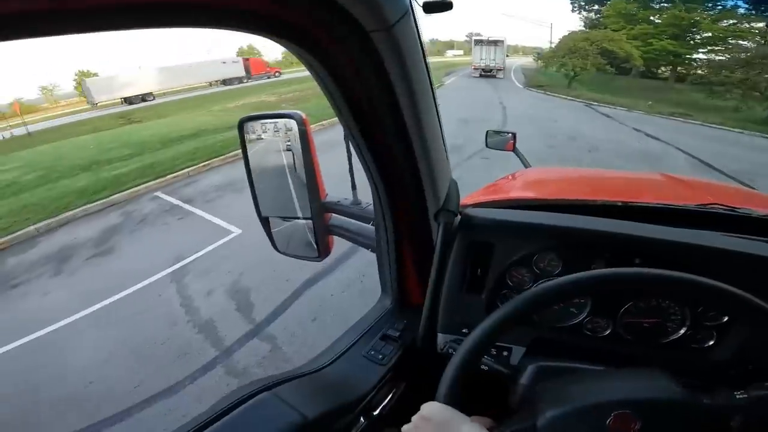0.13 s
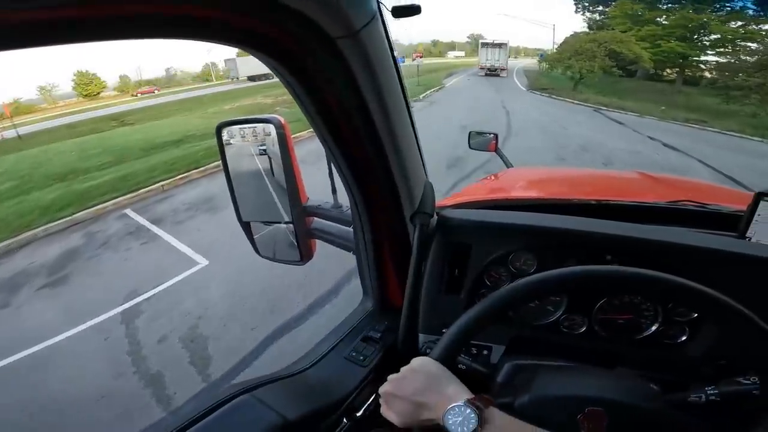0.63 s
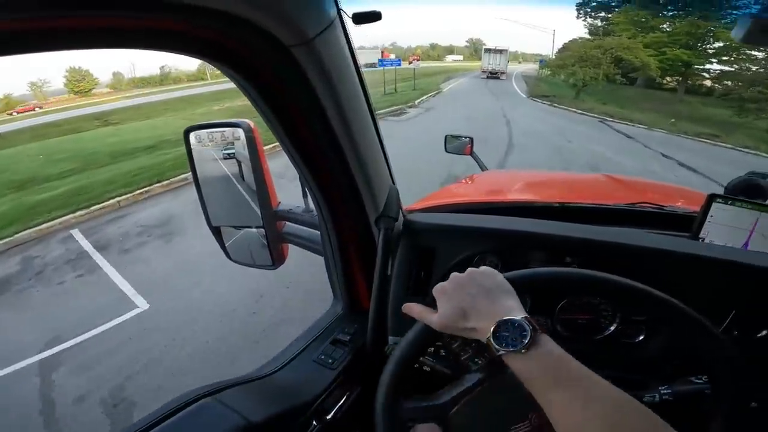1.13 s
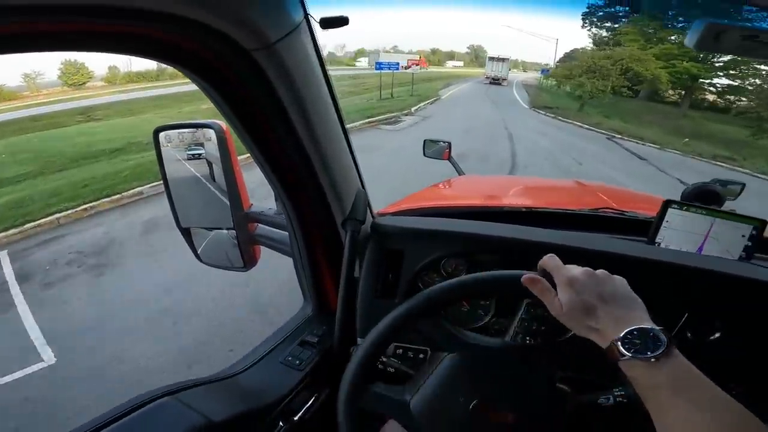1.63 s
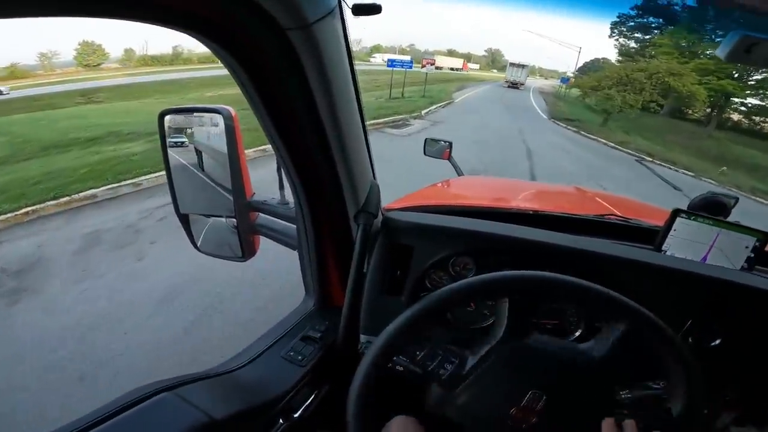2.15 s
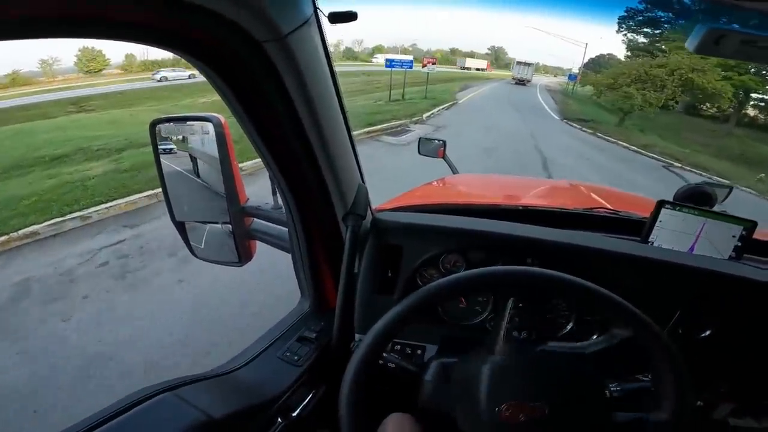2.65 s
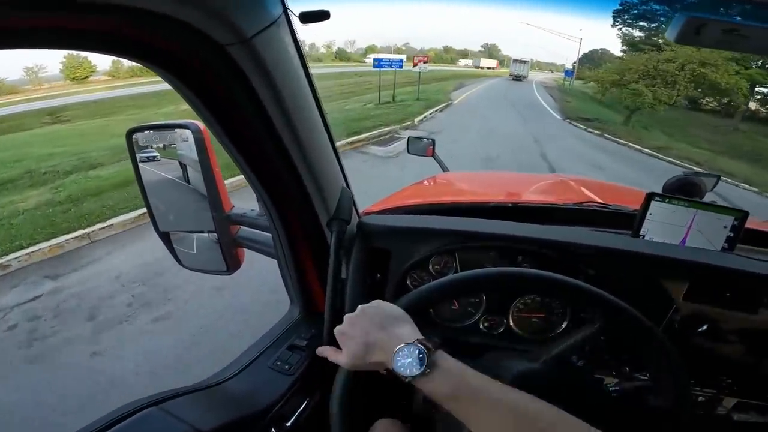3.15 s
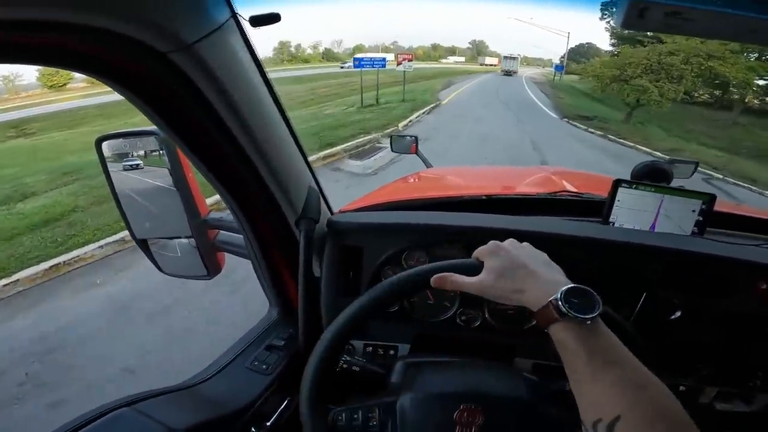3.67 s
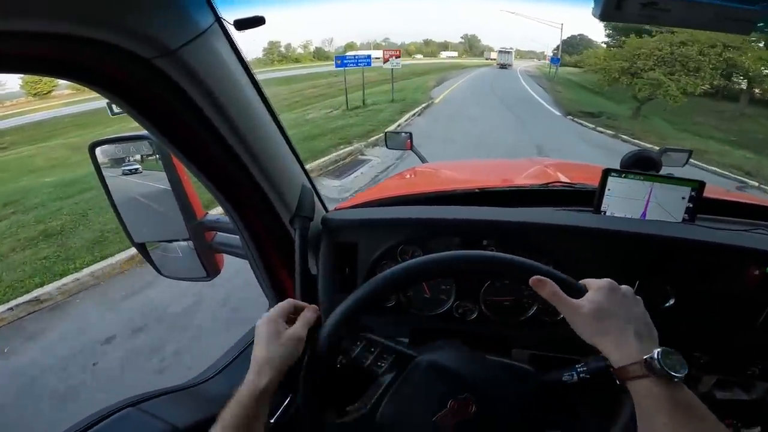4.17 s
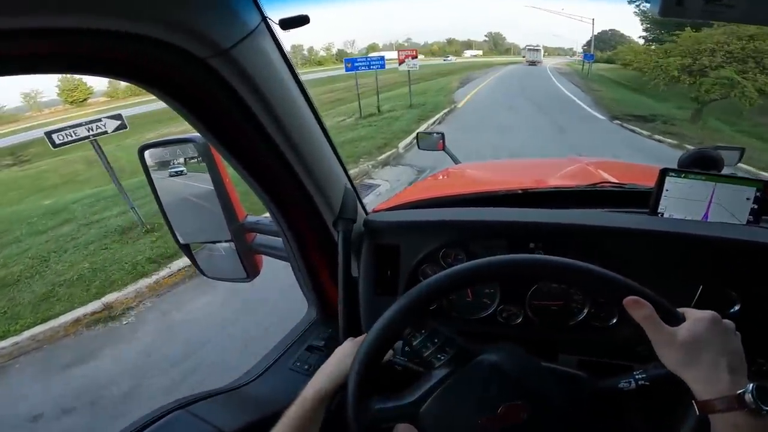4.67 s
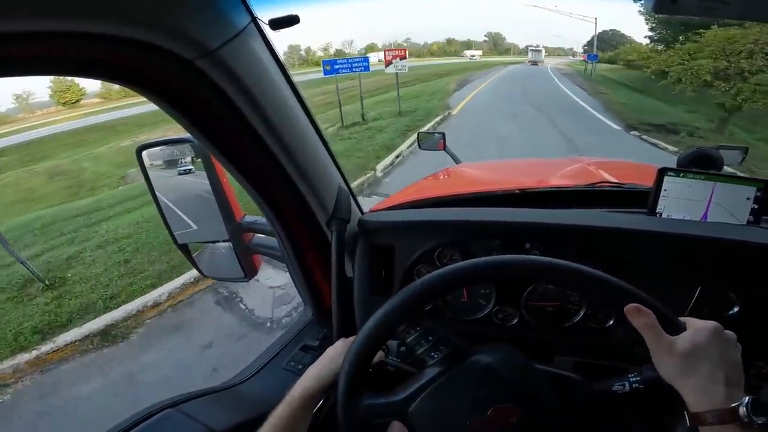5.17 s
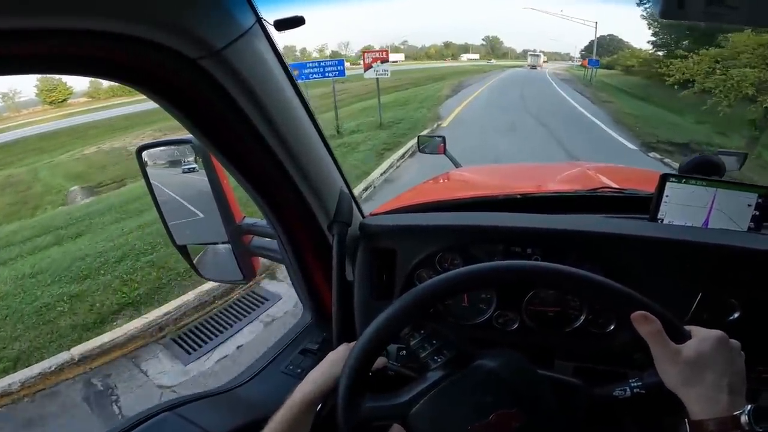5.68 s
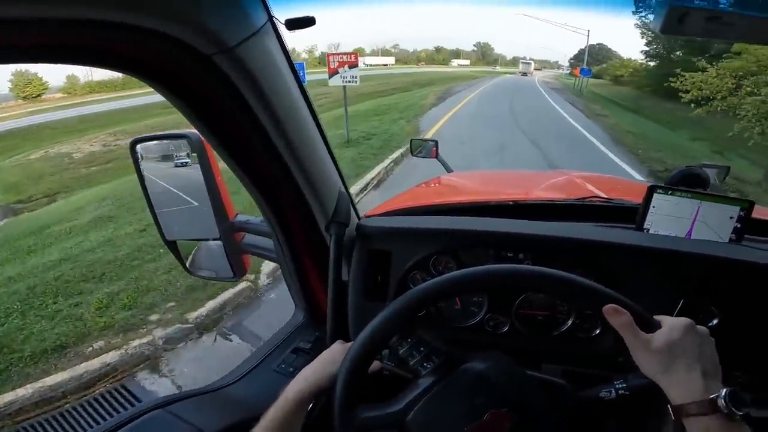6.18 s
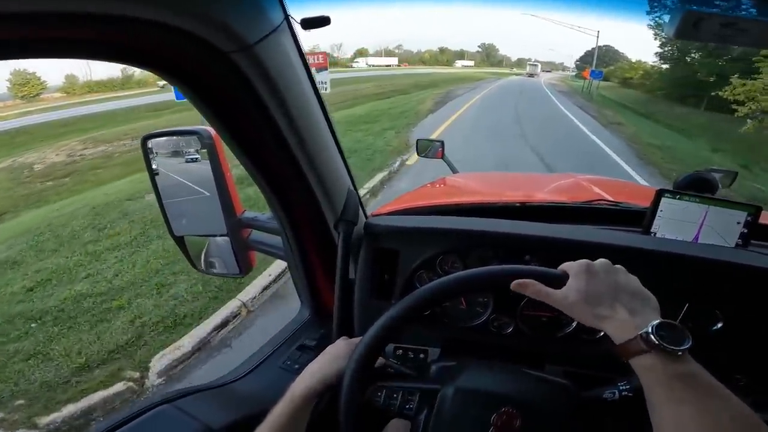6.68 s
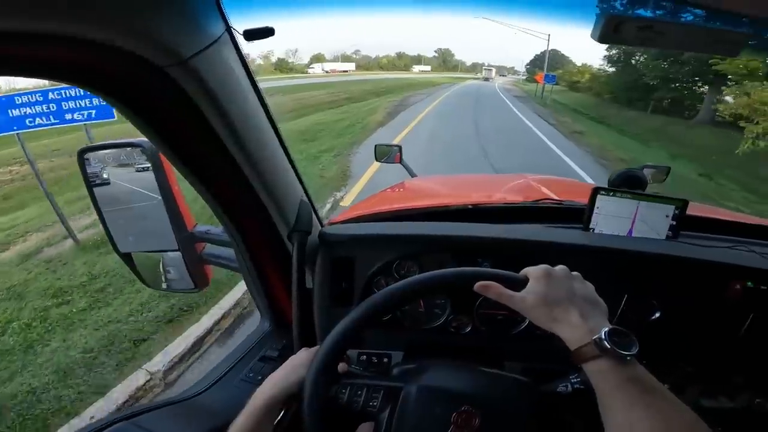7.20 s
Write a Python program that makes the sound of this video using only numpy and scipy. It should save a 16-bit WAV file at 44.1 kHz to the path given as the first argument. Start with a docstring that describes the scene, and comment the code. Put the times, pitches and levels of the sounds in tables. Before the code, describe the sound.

Heard from the driver's head in a closed truck cab, a bass-heavy diesel drone rises in pitch as the truck pulls away. A compressor thumps beneath it, making panels resonate. Low rumble and muffled clatter thicken with load. After about five seconds the revs drop for one gear change, then climb again. Faint squeaks, a small tick and soft hand slides on the wheel sit close by.

```python
"""A diesel truck booms and rumbles as it pulls away, heard in the cab at the driver's head.
Six firings an engine cycle drive the boom; a gear-driven air compressor thumps through sharp panel
resonances. Shaped noise makes rumble, clatter, hiss and intake roar; gliding tones make a faint turbo
whistle. Narrow noise bands squeak and hum in the trim, and grainy hisses are a hand sliding on the
wheel. The revs fall at one gear change, and two close microphones hear partly shared sound."""
import sys
import numpy as np
from scipy import signal
from scipy.fft import rfft, irfft
from scipy.io import wavfile
from scipy.ndimage import uniform_filter1d, minimum_filter1d

SR = 44100
rng = np.random.default_rng(int(sys.argv[2]) if len(sys.argv) > 2 else 0)


def attenuation_scalar(level_db):
    """Turn a level in dB into a linear amplitude multiplier (20 dB per decade)."""
    decades = np.asarray(level_db, float) / 20
    return 10 ** decades


def transcribe(signal):
    """Save signal, clipped to [-1, 1], as a 16-bit WAV file at the path in sys.argv[1]."""
    frames = np.atleast_2d(signal).T
    limited = np.clip(frames, -1, 1)
    pcm = np.round(limited * 32767).astype(np.int16)
    wavfile.write(sys.argv[1], SR, pcm)


N = 322812
T = np.arange(N) / SR  # s
F = np.maximum(np.arange(N // 2 + 1) * SR / N, 1)  # Hz

# how load lifts the noises and hums, with a sag at the gear change: (time [s], level [dB])
LOAD = [(0, 1), (.8, 0.07), (2.6, 1), (3.4, 2), (4, 4), (5.35, 4.5), (5.7, 2.5), (6.3, 3), (6.9, 4.6),
        (7.32, 5)]
COMPRESSOR_TURNS = 2.457  # per engine cycle


def unit(x):
    """Scales a sound to rms 1."""
    return x / np.sqrt(np.mean(x ** 2))


def read(table, hz, column=1):
    """Reads a table's column at these frequencies, along a logarithmic frequency axis."""
    rows = np.array(table, float)
    return np.interp(np.log(hz), np.log(rows[:, 0]), rows[:, column])


def curve(table, column=1):
    """Reads a column of a table in time at every sample."""
    rows = np.array(table, float)
    return np.interp(T, rows[:, 0], rows[:, column])


def colour(x, spectrum):
    """Passes a sound through a response in frequency and scales it to rms 1."""
    return unit(irfft(rfft(x) * attenuation_scalar(read(spectrum, F)), N))


def band(hz, width):
    """Noise in one bell-shaped band, rms 1; its amplitude falls to 1/e at width [Hz] from the middle."""
    bell = np.exp(-((F - hz) / width) ** 2)
    return unit(irfft(rfft(rng.standard_normal(N)) * bell, N))


def walk(rate):
    """Random levels, rate of them a second, smoothed twice; spread near 1."""
    hold = int(SR / rate)
    steps = np.repeat(rng.standard_normal(N // hold + 1), hold)
    return 1.93 * uniform_filter1d(uniform_filter1d(steps, hold), hold)[:N]


def bump(middle_s, half_s):
    """A smooth rise and fall, 1 in the middle and 1/e at half_s from it."""
    return np.exp(-((T - middle_s) / half_s) ** 2)


def sine(hz):
    """A gliding sine of rms 1, its phase summed from its frequency."""
    return np.sqrt(2) * np.sin(2 * np.pi * np.cumsum(hz) / SR)


def swept_tone(hz, path):
    """A gliding tone whose level follows the cab's response at its pitch."""
    return attenuation_scalar(read(path, hz)) * sine(hz)


def orders(hz, table, path, wobble_db):
    """Overtones of a shaft, each swelling as it sweeps through the cab's resonances."""
    step = 32  # samples between computed gains
    slow_hz = hz[::step]
    turns = np.cumsum(hz) / SR
    out = 0
    for (multiple, db), start in zip(table, rng.random(len(table))):
        gain = attenuation_scalar(db + read(path, multiple * slow_hz) + wobble_db * walk(5)[::step])
        overtone = np.sin(2 * np.pi * (multiple * turns + start))
        out = out + np.interp(T, T[::step], gain) * overtone
    return np.sqrt(2) * uniform_filter1d(out, size=9)


def pair(source):
    """Two microphones: a shared sound, slightly shifted between them, and a part each hears alone."""
    # the two microphones: (frequency [Hz], unshared share of amplitude [0..1],
    # phase by which left leads [rad], left minus right [dB])
    microphones = [(60, .02, 0.1, -0.4), (200, 0.057, 0.11, 3), (400, 0.12, 0.4, -0.5),
                   (700, 0.41, 0.2, 0.5), (1220, 0.5, 0, 0), (2530, 0.49, -0.3, .5), (4520, .7, -0.37, 2),
                   (7000, 0.64, -0.2, -0.5), (13000, 1, 0, 3)]
    alone = np.clip(read(microphones, F), 0, 1)
    level = attenuation_scalar(read(microphones, F, column=3) / 2)
    turn = level * np.exp(.5j * read(microphones, F, column=2))
    shared = rfft(source()) * np.sqrt(1 - alone ** 2)
    # each call of source() draws fresh noise
    return np.array([irfft(side * (shared + alone * rfft(source())), N) for side in (turn, 1 / turn)])


def engine_cycles():
    """Engine cycles per second, each cycle two crank turns."""
    # revs climb, fall at the gear change and climb again: (time [s], engine cycles [1/s])
    revs = [(0, 5.0), (.9, 6.82), (1.15, 7.14), (1.75, 7.87), (2.2, 8.28), (3.25, 8.82), (3.8, 9.28),
            (4.05, 9.44), (4.25, 9.76), (4.6, 10.49), (4.85, 10.77), (5.25, 11.44), (5.42, 11.5),
            (5.6, 11.06), (5.98, 9.53), (6.55, 9.51), (6.75, 9.82), (7.05, 10.5), (7.32, 10.86)]
    return curve(revs)


def engine(cycle_hz):
    """Six firings a cycle boom in the cab, with firing overtones and other multiples of the engine cycle."""
    # firing overtones and other multiples: (multiple of the engine cycle, relative level [dB])
    overtones = [(2, 23), (3, 24.5), (4, 8), (5, 6.5), (7, 4.5), (8, 5.5), (9, 6), (10, 6), (11, -3.5),
                 (12, 6.5), (13, -4), (14, -6.5), (15, -1), (16, -6), (18, -5.5), (20, -15), (24, -16.5),
                 (26, -15.5), (28, -19.5), (30, -15.5), (34, -12), (36, -12), (38, -11.5), (40, -13.5),
                 (42, -14), (44, -12), (46, -16.5), (48, -16.5)]
    # how the cab passes those multiples on: (frequency [Hz], gain [dB])
    cab_path = [(10, -90), (30, -55), (60, -43), (80, -53), (92, -36), (104, -41.5), (116, -30),
                (128, -28.5), (140, -27.5), (152, -30.5), (165, -39), (185, -32.5), (205, -38), (240, -37),
                (310, -50.5), (370, -39.5), (420, -46), (550, -50)]
    # cab boom at the firing tone: (frequency [Hz], level [dB])
    boom = [(30, -19), (36, -16.5), (39.5, -15), (42, -20), (43.5, -14), (45, -17.5), (47.5, -12),
            (50.5, -17), (52, -16.5), (53.5, -21), (55.3, -43.5), (56.6, -23), (59, -21.5), (63, -26.5),
            (68, -44)]
    # sag as the throttle lifts for the gear change: (middle [s], time to 1/e [s], depth [dB])
    throttle_lift = (5.35, .3, -3.5)
    middle_s, half_s, lift_db = throttle_lift
    pull_away_db, pull_away_s = 9.5, .5  # extra at the start, and its decay time to 1/e
    pulling = attenuation_scalar(pull_away_db * np.exp(-T / pull_away_s) + lift_db * bump(middle_s, half_s))
    return swept_tone(6 * cycle_hz, boom) + pulling * orders(cycle_hz, overtones, cab_path, wobble_db=2.3)


def compressor(cycle_hz):
    """A gear-driven air compressor thumps once a turn through floor and panels, and shakes the seat."""
    # overtones of the thump: (multiple of the compressor's turn, relative level [dB])
    thump = [(1, 11), (3, 3), (4, 9), (5, 4.5), (6, 2.5), (7, 2.5), (8, 0), (9, 2), (10, -3), (11, -5),
             (12, -7), (13, -7.5), (14, -7), (15, -8), (16, -10), (17, -9)]
    # floor and panel resonances between compressor and ear: (frequency [Hz], gain [dB])
    panel_path = [(12, -60), (28, -48), (40, -59), (75, -50), (92, -50), (102, -39), (112, -31), (122, -32),
                  (136, -43.5), (148, -37), (160, -50), (180, -47), (192, -32.5), (200, -25), (208, -29.5),
                  (218, -37.5), (226, -46.5), (236, -38), (255, -47), (300, -52), (450, -56)]
    # seat shake at the second overtone: (frequency [Hz], level [dB])
    seat_shake = [(25, -44), (33, -41), (41.5, -56.5), (45, -25), (47, -27.5), (51.5, -22.5), (56, -23.5)]
    turn_hz = COMPRESSOR_TURNS * cycle_hz
    return orders(turn_hz, thump, panel_path, wobble_db=.7) + swept_tone(2 * turn_hz, seat_shake)


def road_rumble():
    """Road and chassis rumble: low noise that grows with load."""
    # tone of the rumble: (frequency [Hz], relative level [dB per Hz])
    rumble_tone = [(8, -6), (21, 0), (36, 6.5), (50, 8.5), (73, 17.5), (95, 16), (124, 13), (150, 10.5),
                   (172, 11), (198, 8), (225, 2.5), (270, -10), (400, -50.5)]
    rumble = pair(lambda: colour(rng.standard_normal(N), rumble_tone))
    return attenuation_scalar(-34.5 + curve(LOAD)) * rumble


def clatter(cycle_hz):
    """Engine clatter and hiss: noise that puffs at each firing, more so at high revs, and grows with load."""
    # engine clatter, tyres and air through the firewall: (frequency [Hz], relative level [dB per Hz])
    knock_tone = [(150, -41.5), (260, -0.5), (286, -8.5), (360, -5), (402, -10), (481, -10.5), (510, -12.5),
                  (643, -12), (737, -12), (795, -18.5), (928, -16), (1120, -17.5), (1260, -18.5),
                  (1620, -24.5), (2000, -27.5), (2600, -51), (4400, -120)]
    # wind and intake hiss: (frequency [Hz], relative level [dB per Hz])
    hiss_tone = [(1060, -31), (1800, -3.5), (2930, -8.5), (3400, -8), (4190, -11.5), (4900, -12),
                 (5540, -16), (7110, -20.5), (7700, -24), (8250, -38), (10500, -42), (11700, -50),
                 (12000, -68), (12600, -85)]
    cycles = np.cumsum(cycle_hz) / SR
    puff = 1 + 0.11 * (cycle_hz / 10) ** 2 * np.cos(2 * np.pi * 6 * cycles)  # six firings a cycle
    # a weak random pattern that returns every cycle
    pattern = rng.standard_normal(128)
    repeat = np.interp(cycles % 1, np.linspace(0, 1, len(pattern)), pattern)
    knock = pair(lambda: colour(puff * rng.standard_normal(N) + 0.087 * repeat, knock_tone))
    hiss = pair(lambda: colour(puff * attenuation_scalar(0.49 * walk(12)) * rng.standard_normal(N), hiss_tone))
    load_db = curve(LOAD)
    return attenuation_scalar(-41.5 + load_db) * knock + attenuation_scalar(-56.5 + .95 * load_db) * hiss


def intake_roar(cycle_hz):
    """A narrow band of intake roar, strongest at low revs."""
    # the roar's band: (frequency [Hz], width to 1/e [Hz])
    roar_band = (3450, 210)
    octaves = np.log2(cycle_hz / 5.0)  # above 5 engine cycles per second
    return attenuation_scalar(-66.5 - 12 * octaves) * pair(lambda: band(*roar_band))


def whistle(hz, db):
    """A thin tone that flickers in pitch and level."""
    hz = hz * (1 + .003 * walk(150))
    return attenuation_scalar(db + 2 * walk(25)) * sine(hz)


def turbo():
    """Blade tone, its mirror about a fixed frequency, and a second wheel's patchy lower whistle."""
    # blade tone: (time [s], frequency [Hz], level [dB])
    blade = [(0, 5750, -81), (.65, 6420, -80), (.75, 6700, -92), (1.3, 7450, -88), (1.6, 7280, -83),
             (1.75, 7350, -82), (2.05, 8050, -84), (2.3, 8250, -84), (2.8, 8420, -90), (3.6, 9150, -84),
             (4.2, 9780, -82), (4.45, 10250, -82), (4.72, 10450, -81), (4.95, 11800, -86),
             (5.2, 11750, -91), (5.45, 11350, -86), (5.65, 12050, -86), (5.95, 11880, -87),
             (6.2, 12250, -86), (6.5, 12250, -91), (7.32, 12750, -99)]
    hz, db = curve(blade), curve(blade, column=2)
    # the second wheel, on the same shaft, whistles once the blade tone is above 11 kHz
    fast = uniform_filter1d(1. * (hz > 11000), size=4000)
    lower = fast * whistle(.646 * hz, db + 7 + 2 * walk(5))
    mirror_hz = 12000
    # the mirror tone fades by .04 dB per Hz once the blade tone is above that frequency
    mirror_db = db - 3 - .04 * np.maximum(hz - mirror_hz, 0)
    return whistle(hz, db) + whistle(2 * mirror_hz - hz, mirror_db) + lower


def trim():
    """Cab trim: short rough notes, and narrow panel hums that grow with load."""
    # squeaks, ticks and a rustle:
    # (time [s], frequency [Hz], width to 1/e [Hz], time to 1/e [s], level [dB])
    squeaks = [(.12, 3250, 25, .12, -67), (.47, 3400, 25, .12, -66), (.699, 2200, 250, .008, -49),
               (.699, 7000, 400, .01, -65), (.767, 7400, 90, .012, -64), (.79, 6750, 90, .014, -63),
               (1.27, 3420, 60, .1, -71), (3.83, 9500, 4000, .002, -64), (6.72, 7300, 80, .03, -73),
               (6.8, 3000, 900, .09, -60), (6.83, 1040, 260, .12, -43)]
    # panel hums at a load of 3 dB: (frequency [Hz], width to 1/e [Hz], level [dB])
    panel_hums = [(368, 25, -58), (474, .4, -55), (927, 14, -58), (1422, 5, -67), (1529, 20, -68)]
    notes = sum(attenuation_scalar(db) * bump(s, half_s) * band(hz, width) for s, hz, width, half_s, db in squeaks)
    hums = sum(attenuation_scalar(db) * band(hz, width) for hz, width, db in panel_hums)
    return notes + attenuation_scalar(curve(LOAD) - 3) * hums


def hand_slides():
    """Skin sliding on the wheel rim: a grainy hiss, swelling and fading at each slide."""
    # strokes of the hand: (middle [s], time to 1/e [s], level [dB])
    strokes = [(1.3, .12, -76), (2.17, .17, -70), (2.72, .09, -68), (3.08, .14, -55.5), (3.7, .15, -75),
               (6.38, .1, -69)]
    # tone of skin on the rim: (frequency [Hz], relative level [dB per Hz])
    skin_tone = [(1800, -30), (3000, -9), (4800, -1), (5700, -3), (7000, -1), (8400, -8), (10400, -7),
                 (12000, -12), (13800, -17), (15000, -50)]
    shape = sum(attenuation_scalar(db) * bump(s, half_s) for s, half_s, db in strokes)
    return shape * pair(lambda: colour(rng.standard_normal(N) * attenuation_scalar(.8 * walk(76)), skin_tone))


def scene():
    """All sources at the driver's head; the bass reaches both microphones almost alike."""
    cycle_hz = engine_cycles()
    bass_balance = attenuation_scalar(np.array([[-.1], [.1]]))  # left, right dB
    treble_balance = attenuation_scalar(np.array([[1.5], [-1.5]]))
    bass = bass_balance * (engine(cycle_hz) + compressor(cycle_hz))
    noises = road_rumble() + clatter(cycle_hz) + intake_roar(cycle_hz)
    whistles_and_trim = treble_balance * (turbo() + trim())
    return bass + noises + whistles_and_trim + hand_slides()


def band_limit(x):
    """A steep low-pass at the top of the band."""
    return signal.sosfilt(signal.butter(12, 14300, fs=SR, output="sos"), x)


def record(dry):
    """A limiter dips the gain of both microphones together around the highest peaks."""
    limit, hold_s = .41, .03  # of full scale, s
    hold = int(hold_s * SR)
    gain = np.minimum(1, limit / (np.abs(dry).max(axis=0) + 1e-9))
    gain = uniform_filter1d(minimum_filter1d(gain, hold), hold)
    return band_limit(dry * gain)


dry = scene()
out = record(dry)
transcribe(out)
```